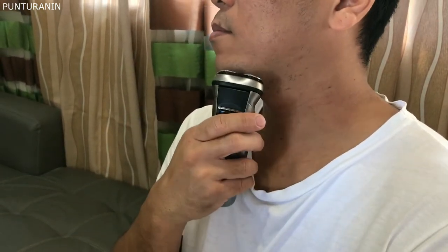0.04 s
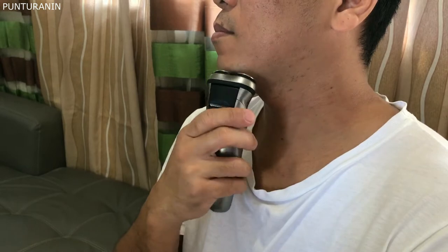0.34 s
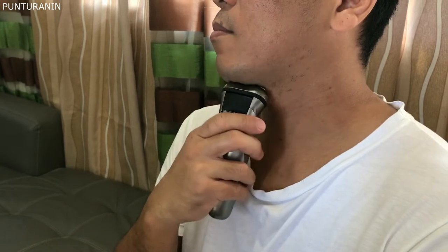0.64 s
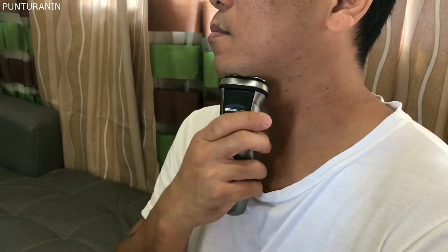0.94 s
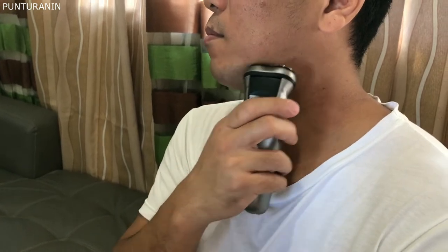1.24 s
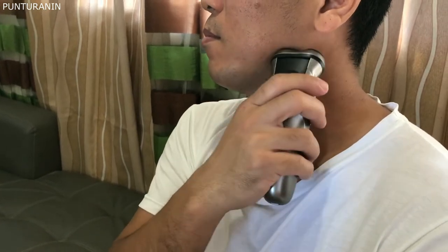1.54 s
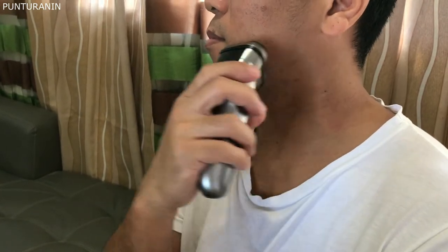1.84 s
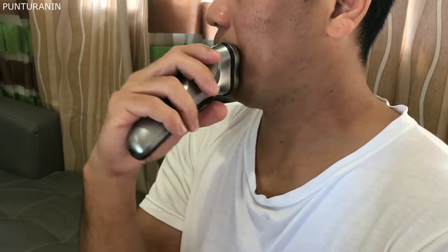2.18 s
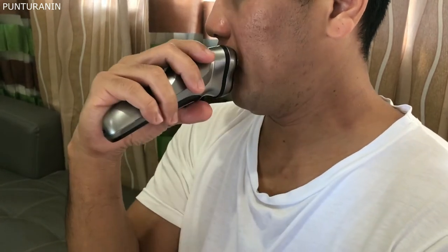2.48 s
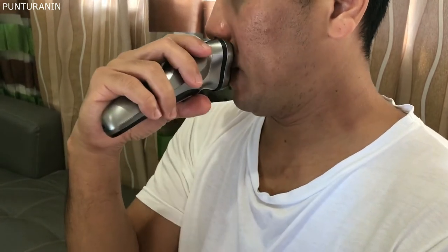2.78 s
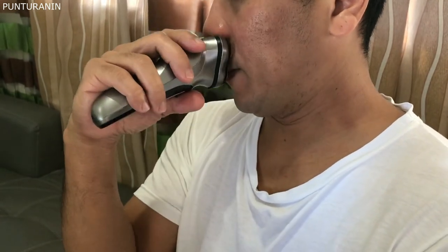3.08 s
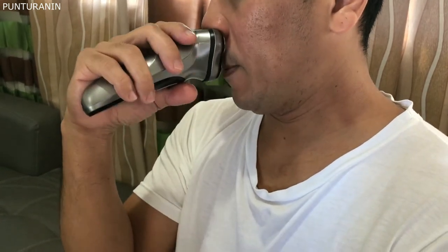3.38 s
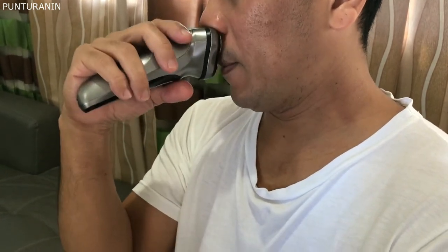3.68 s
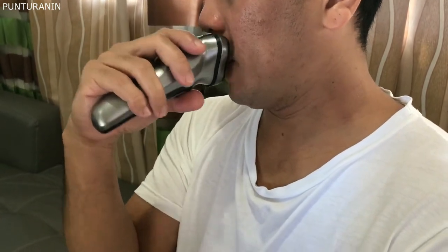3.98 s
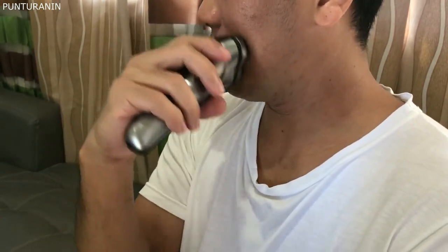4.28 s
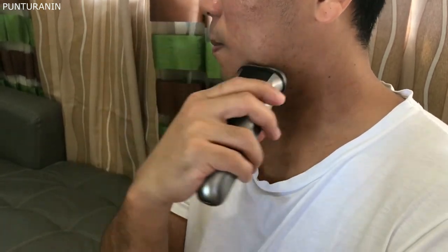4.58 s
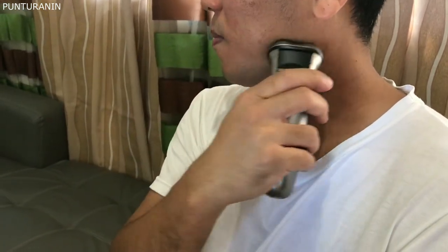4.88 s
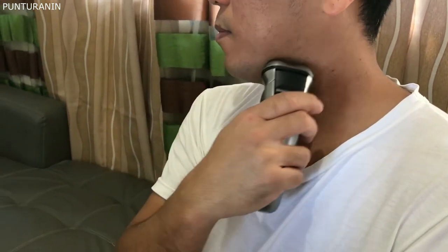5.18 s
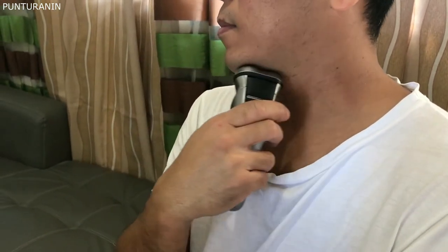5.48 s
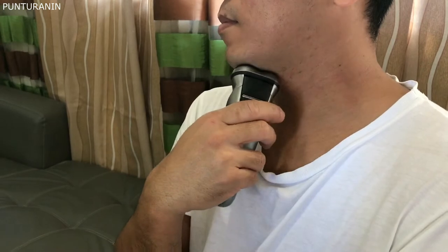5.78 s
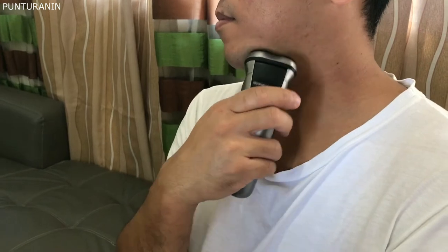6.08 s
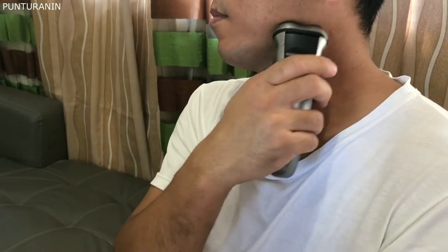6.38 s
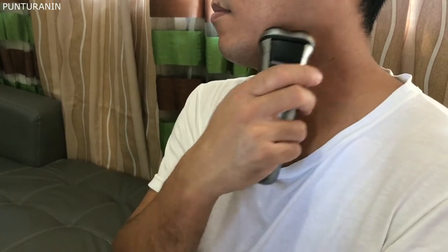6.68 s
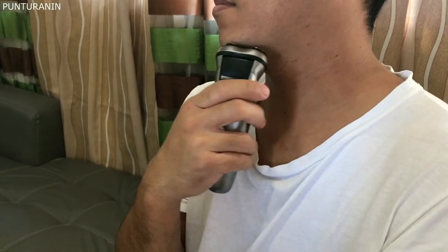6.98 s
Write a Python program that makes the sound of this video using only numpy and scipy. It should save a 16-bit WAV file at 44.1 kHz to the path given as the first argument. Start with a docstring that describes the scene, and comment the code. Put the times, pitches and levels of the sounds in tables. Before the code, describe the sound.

A rotary electric shaver runs without a break, close to the microphone in a quiet room. Its small motor holds a steady high whine under a bright, metallic scraping buzz. Stubble crackles and sizzles finely as it is cut, and the tone shifts slightly as the head slides over neck and chin. Now and then the hiss briefly thins to glassy tones. Soft low bumps and a faint sleeve rustle come from the moving arm.

```python
"""Rotary electric shaver on neck and chin

Close by, in a quiet room, a small motor whines and drives the cutters through gears. The blades scrape
round inside metal guards, whose resonances open and shut as skin covers them. Stubble crackles as it
snaps; hand and arm add soft rumbles and a rustle. Now and then the hiss thins briefly to glassy tones."""
import sys
import numpy as np
from scipy import signal
from scipy.fft import rfft, irfft, next_fast_len
from scipy.io import wavfile
from scipy.ndimage import uniform_filter1d

SR = 44100
rng = np.random.default_rng(int(sys.argv[2]) if len(sys.argv) > 2 else 0)


def digitize_waveform(pressure):
    """Quantize a signal to 16-bit integers and store it at the path in sys.argv[1].

    Rows of a 2-D input are taken as channels; values are limited to [-1, 1].
    """
    field = np.atleast_2d(pressure).T
    bounded = np.clip(field, -1, 1)
    quanta = np.round(bounded * 32767).astype(np.int16)
    wavfile.write(sys.argv[1], SR, quanta)


N = 310023
T = np.arange(N) / SR

# head resonances: (centre [Hz], half width [Hz], lift [dB], rattles [1/cutter turn], rattle swing [dB])
HEAD_MODES = [(2402, 87, 7.5, 1, 2), (2801, 31, 7, 3, 5.5), (3106, 116, 4.5, 3, 4), (3485, 180, 4, 3, -4.5),
              (4210, 145, 3.5, 3, 2.5), (5790, 230, 7, 3, 4.5), (7210, 150, 9.5, 3, 4)]
# brief level dips: (middle [s], length [s], depth [dB])
DIPS = [(.063, .045, -32), (.283, .022, -16), (.399, .027, -14), (.491, .03, -9), (.7, .022, -15),
        (.957, .025, -15), (1.072, .02, -14), (1.329, .023, -16), (1.444, .022, -15), (1.492, .02, -12),
        (1.621, .046, -27), (1.817, .068, -40), (1.956, .031, -7), (2.372, .028, -13), (2.443, .022, -9),
        (2.992, .05, -25), (3.046, .02, -14), (3.116, .02, -12), (3.255, .028, -15), (3.603, .022, -15),
        (3.778, .048, -29), (3.881, .023, -12), (4.082, .048, -28), (4.509, .016, -12), (4.788, .021, -14),
        (5.147, .052, -27), (6.089, .026, -13), (6.297, .022, -16), (6.505, .023, -16)]
FAINT_DB = -66  # partials listed below this level follow the dips


def amp(db):
    """Decibels to amplitude."""
    return 10 ** (np.asarray(db) / 20)


def unit_rms(x):
    """Scales x to rms 1."""
    return x / np.sqrt(np.mean(x ** 2) + 1e-20)


def curve(rows):
    """(time, value) rows joined by straight lines, per sample."""
    return np.interp(T, *np.transpose(rows))


def spectrum_db(points, hz):
    """(frequency, dB) points interpolated over log frequency."""
    point_hz, db = np.transpose(points)
    return np.interp(np.log(hz + 1), np.log(point_hz), db)


def colour(x, points):
    """Filters x with a spectrum; rms 1."""
    size = next_fast_len(N)
    gain = amp(spectrum_db(points, np.fft.rfftfreq(size, 1 / SR)))
    return unit_rms(irfft(rfft(x, size) * gain, size)[:N])


def drift(rate_hz, knots=2048):
    """Smooth random wander up to about rate_hz; rms 1."""
    hz = np.fft.rfftfreq(knots, T[-1] / knots)
    slow = irfft(rfft(rng.standard_normal(knots)) * bell(hz, 0, rate_hz))
    return np.interp(T, np.linspace(0, T[-1], knots), unit_rms(slow))


def swell(middle_s, length_s):
    """Half-cosine rise and fall, 0-1."""
    return np.cos(np.pi * np.clip((T - middle_s) / length_s, -.5, .5))


def bell(hz, centre_hz, width_hz):
    """Gaussian band, 0-1."""
    return np.exp(-.5 * ((hz - centre_hz) / width_hz) ** 2)


def dips_db():
    """All dips as one gain curve."""
    return sum(db * swell(middle_s, length_s) for middle_s, length_s, db in DIPS)


def patchy(x, patch_s=.13, patch_hz=600, size=512):
    """The colour of a hiss shifts in broad patches from stroke to stroke."""
    # (frequency [Hz], rms swing [dB])
    patch_depth = [(250, 2.2), (800, 2.2), (1400, 1), (4500, 0.8), (7000, 1.4), (9000, 1.8), (15000, 2)]
    hz, _, bands = signal.stft(x, SR, nperseg=size)
    field = uniform_filter1d(rng.standard_normal(bands.shape), round(patch_s * SR / size * 2), axis=1)
    field = unit_rms(uniform_filter1d(field, round(patch_hz / hz[1]), axis=0))
    gain = amp(spectrum_db(patch_depth, hz)[:, None] * field)
    gain /= np.sqrt(np.mean(gain ** 2, axis=1, keepdims=True))
    return signal.istft(bands * gain, SR, nperseg=size)[1][:N]


def room(hum_hz=363, hum_db=-82, air_db=-59):
    """Quiet air and a faint wavering hum that swells once."""
    # air spectrum: (frequency [Hz], level [dB])
    air_colour = [(20, -6), (60, 18.5), (100, -11), (200, -5), (1000, -5), (15000, 2.5)]
    # (middle [s], length [s], level [dB])
    hum_swell = (4.62, 0.38, -60)
    middle_s, length_s, swell_db = hum_swell
    hum = unit_rms(np.cos(2 * np.pi * hum_hz * T + 1.07 * drift(7)))
    hum *= amp(hum_db) + amp(swell_db) * swell(middle_s, length_s)
    return hum + amp(air_db) * colour(rng.standard_normal(N), air_colour)


def rumble(deep_db=-62.5, upper_db=-71.5):
    """The grip rumbles softly, each push of the arm adds a low bump, and the sleeve rustles."""
    # hand and arm bumps: (middle [s], length [s], deep level [dB], upper level [dB])
    bumps = [(0.47, 0.25, -91, -54.5), (0.685, .18, -64, -59), (1.008, 0.2, -58, -46),
             (1.18, 0.33, -60, -45.5), (1.692, 0.068, -56, -49.5), (2.49, 0.21, -56, -56),
             (2.664, 0.097, -55, -49.5), (2.776, 0.17, -51, -51), (3.575, 0.21, -54, -56),
             (3.964, 0.25, -69, -58), (4.2, 0.15, -53.5, -51), (4.536, 0.27, -49.5, -47),
             (4.687, 0.23, -56, -48)]
    # loudest as the arm swings from chin to neck: (time [s], level [dB])
    rustle_level = [(0.0, -67), (0.8, -62.5), (1.03, -55), (1.4, -63), (2.4, -65.5), (3.8, -59),
                    (4.42, -57), (4.65, -52.5), (4.85, -63), (5.1, -68.5), (5.38, -63), (6.3, -64.5),
                    (7.03, -64)]
    # spectra: (frequency [Hz], level [dB])
    deep_colour = [(20, -34), (45, -8), (70, 12), (88, 17.5), (100, 14.5), (115, -12), (160, -42),
                   (400, -58)]
    upper_colour = [(80, -21), (120, 16.5), (145, 12.5), (170, 8), (195, 2.5), (260, 3), (310, -9.5),
                    (1000, -21)]
    rustle_colour = [(150, -0.5), (260, -1.5), (325, -3), (450, -4), (610, 0), (750, -4.5), (1050, -1),
                     (1500, -2), (4000, -56)]
    deep_bumps = sum(amp(db) * swell(middle_s, length_s) for middle_s, length_s, db, _ in bumps)
    upper_bumps = sum(amp(db - 6.5) * swell(middle_s, length_s) for middle_s, length_s, _, db in bumps)
    uneven_db = 1.5 * drift(12)
    deep = np.hypot(amp(deep_db + drift(15)), deep_bumps) * colour(rng.standard_normal(N), deep_colour)
    upper = np.hypot(amp(upper_db), upper_bumps) * colour(rng.standard_normal(N), upper_colour)
    rustle = amp(curve(rustle_level)) * patchy(colour(rng.standard_normal(N), rustle_colour))
    return deep + amp(uneven_db + dips_db()) * (upper + rustle)


def partial(turns, order, db, waver_db=0, waver_hz=3, wobble_rad=0):
    """One tone locked to a shaft, with optional waver in level and phase."""
    phase = 2 * np.pi * (order * turns + rng.random()) + wobble_rad * drift(waver_hz)
    return amp(db) * unit_rms(np.cos(phase) * amp(waver_db * drift(waver_hz)))


def motor(turns):
    """Motor and pinion whine; four strong partials swell and fade with grip and angle."""
    # weaker partials: (order [1/motor turn], level [dB])
    orders = [(6, -73.5), (8, -74.5), (10, -72), (12, -69.5), (20, -80), (27, -62)]
    # strong partials, by order: (time [s], level [dB])
    whine_9 = [(0.0, -60), (0.4, -72.5), (0.65, -62), (1.26, -68), (1.86, -53), (2.31, -64.5), (3.06, -74),
               (4.77, -62), (5.07, -78), (5.22, -62.5), (5.77, -57.5), (6.53, -75), (7.03, -65)]
    whine_11 = [(0.0, -61), (0.32, -76), (0.7, -58), (1.98, -80), (2.83, -54), (3.89, -64), (4.09, -59),
                (4.47, -63), (4.52, -73), (4.62, -68.5), (5.3, -58), (7.02, -67)]
    whine_13 = [(0.0, -52.5), (0.35, -57), (0.45, -49.5), (2.96, -49.5), (3.62, -53), (4.27, -48.5),
                (5.98, -54.5), (6.28, -49), (6.53, -52.5), (7.03, -50.5)]
    whine_14 = [(0.0, -55.5), (0.75, -53), (1.36, -62), (1.61, -56), (1.76, -62), (2.41, -57),
                (4.32, -54.5), (4.47, -68), (5.88, -52.5), (6.63, -69), (6.78, -51), (7.03, -73)]
    dip_gain, whine = amp(dips_db()), 0
    for order, db in orders:
        tone = partial(turns, order, db, waver_db=3.5, waver_hz=3.5, wobble_rad=.36)
        whine += tone * (dip_gain if db < FAINT_DB else 1)
    for order, level in (9, whine_9), (11, whine_11), (13, whine_13), (14, whine_14):
        whine += partial(turns, order, curve(level) - 3)
    return whine


def gears(motor_turns, ratio=20 / 51, off_centre_turns=.00135, play_turns=.0003):
    """Cutter turns; an off-centre pinion and tooth play make them uneven, which gives side tones."""
    runout = off_centre_turns * np.sin(2 * np.pi * motor_turns)
    return ratio * motor_turns + runout + play_turns * drift(30)


def head_openings_db():
    """How freely each head resonance rings as skin covers and uncovers it."""
    # in HEAD_MODES order: (time [s], change of lift [dB])
    ring_1 = [(0.0, 6), (0.42, 2), (0.55, -2), (1.0, -3), (1.09, 3), (1.3, 6.5), (1.5, -9), (1.67, -7),
              (1.8, 6.5), (2.05, 4), (2.24, 1), (2.48, 4), (2.58, 9), (2.8, 6.5), (2.88, 3), (3.03, 4),
              (3.15, -1), (3.38, 5.5), (3.59, -5), (3.68, 5), (3.88, 4.5), (4.0, 7.5), (4.12, 2.5),
              (4.3, 1.5), (4.49, -6), (4.61, -4), (4.92, -20), (5.06, 0.5), (5.24, -17), (5.51, -2.5),
              (5.97, -1.5), (6.06, 4), (6.25, -12), (7.02, 6.5)]
    ring_2 = [(0.0, 0.5), (0.5, 6.5), (0.68, 5.5), (0.94, 2), (1.27, 0), (1.39, 7.5), (1.73, 6), (1.9, -1),
              (2.24, 1), (2.45, 5.5), (2.65, 0), (3.69, 1.5), (4.34, -6), (4.5, 4.5), (4.67, -6), (4.9, -3),
              (5.09, 5), (5.33, -14), (5.47, 5), (5.6, 1.5), (5.82, 5), (6.1, 1.5), (6.26, 5), (6.49, -1),
              (6.6, 9), (7.02, 5.5)]
    ring_3 = [(0.0, -1), (0.42, -2), (0.56, -14), (0.68, 3.5), (1.04, -9), (1.32, 0), (1.7, 3), (1.99, 1),
              (2.81, 3.5), (3.51, -1), (4.28, 1), (4.57, 1), (5.159, -2.5), (5.81, -2), (6.03, -7.5),
              (6.6, 0), (7.02, -8)]
    ring_4 = [(0.0, -1), (0.3, 6.5), (0.8, -4.5), (1.25, 3), (1.34, 1), (1.77, 0), (1.96, -4.5),
              (2.93, -8.5), (4.17, -2), (4.45, 5), (4.59, 4), (4.66, -3), (5.3, -8), (5.47, 2), (5.54, -2),
              (6.07, 4), (6.37, -7), (6.66, 0), (6.74, 6), (7.02, 10.5)]
    ring_5 = [(0.0, 2), (0.3, 2.5), (0.67, 0), (1.05, -1.5), (1.6, 0.5), (1.82, 5), (1.92, 0), (2.2, -2),
              (2.3, 3.5), (2.55, 4.5), (2.85, -0.5), (3.51, -2), (3.63, 2.5), (3.8, -6), (4.02, -1),
              (4.32, -1), (4.7, 2), (4.95, 5.5), (5.12, -1), (5.38, 6), (5.47, 3), (5.8, -2), (6.3, 4),
              (6.59, 3), (7.02, -1.5)]
    ring_6 = [(0.0, 3), (0.31, 5), (0.45, -1), (0.75, -2.5), (1.02, 1), (1.42, -0.5), (1.55, 0.5),
              (1.78, -3.5), (2.0, 0.5), (2.88, -2), (3.58, 2.5), (4.33, 2.5), (4.47, -4.5), (4.68, 4),
              (4.8, 2.5), (5.03, -4), (5.25, 1), (5.45, -3), (5.75, -2), (6.1, 1), (6.32, -1), (6.42, -6),
              (7.02, 3.5)]
    ring_7 = [(0.0, -1), (0.27, -2), (0.57, -7), (0.69, -1), (0.98, -21), (1.28, -5), (1.58, -1),
              (1.86, -1), (1.95, -9), (2.56, 5.5), (3.03, 2.5), (4.21, 8), (4.45, 4), (4.94, -3), (5.05, 2),
              (5.77, -5.5), (6.49, -0.5), (7.02, -3.5)]
    return [curve(ring) for ring in (ring_1, ring_2, ring_3, ring_4, ring_5, ring_6, ring_7)]


def cutters(turns, follow_db_per_db=1.46, chin_damping_db=-2):
    """Blades buzz past the guard slots; each partial swells with the resonance it lies in."""
    # buzz, and partials that sing only against the chin: (order [1/cutter turn], level [dB])
    buzz_orders = [(2, -74), (30, -76), (31, -82), (42, -66), (43, -79), (44, -75), (45, -61), (49, -68.5),
                   (50, -57.5), (52, -77), (53, -92), (58, -55), (61, -55.5), (64, -59.5), (69, -64),
                   (87, -53), (90, -56), (93, -68), (108, -58), (116, -52), (119, -54), (121, -58),
                   (124, -59)]
    chin_orders = [(84, -50.5), (90, -50.5)]
    # head flat on the chin: (time [s], contact [0-1])
    chin_contact = [(1.85, 0.1), (2.3, 0.6), (2.9, 0.8), (3.4, 0.35), (4.2, 0.4), (4.45, 0)]
    turn_hz = turns[-1] / T[-1]
    openings_db, dip_gain, buzz = head_openings_db(), amp(dips_db()), 0
    for order, db in buzz_orders:
        lift_db = follow_db_per_db * sum(
            bell(order * turn_hz, centre_hz, width_hz) * open_db
            for (centre_hz, width_hz, *_), open_db in zip(HEAD_MODES, openings_db))
        tone = partial(turns, order, db + lift_db, waver_db=2, waver_hz=11, wobble_rad=.29)
        buzz += tone * (dip_gain if db < FAINT_DB else 1)
    singing = sum(partial(turns, order, db, waver_db=4, waver_hz=4.4, wobble_rad=.18)
                  for order, db in chin_orders)
    on_chin = curve(chin_contact)
    return amp(chin_damping_db * on_chin) * buzz + on_chin * singing


def impulses(per_s, spread_db, max_spreads):
    """Random impulses with a capped exponential spread of levels."""
    hits = rng.random(N) < per_s / SR
    return hits * amp(spread_db * np.minimum(rng.exponential(1, N), max_spreads))


def decaying(hits, decay_s, samples):
    """Envelope that jumps at each hit and dies away."""
    return signal.oaconvolve(hits, np.exp(-T[:samples] / decay_s))[:N]


def hair_snaps(thick_per_s=12, clump_db=.8):
    """Tiny clicks in clumps; now and then a thick hair gives a short, louder rasp."""
    clicks = impulses(per_s=4000, spread_db=2.2, max_spreads=4)
    snaps = decaying(clicks, decay_s=.0006, samples=N // 128) * rng.standard_normal(N)
    thick_hits = (rng.random(N) < thick_per_s / SR) * rng.random(N)
    thick = decaying(thick_hits, decay_s=.008, samples=N // 128)
    return unit_rms(snaps * amp(clump_db * drift(20)) * (1 + .9 * thick))


def crackle():
    """Stiff hairs break in short noise bursts."""
    breaks = impulses(per_s=25, spread_db=3.5, max_spreads=2.5)
    return unit_rms(decaying(breaks, decay_s=.009, samples=N // 64) * rng.standard_normal(N))


def stubble():
    """Hairs snap between blade and slot: a fine rasp with a crackling sizzle on top."""
    # amount of hair cut, and its treble sizzle: (time [s], level [dB])
    cutting_level = [(0.0, -2.5), (1.41, -3), (1.5, -5.5), (2.17, 0), (2.43, -7), (2.8, 1), (3.04, -1.5),
                     (3.44, -2), (3.55, -5), (3.72, 0), (3.88, -3), (4.02, -2), (4.52, -2.5), (4.6, 1.5),
                     (4.79, -2), (4.94, -0.5), (5.05, -3.5), (5.37, -0.5), (5.95, -3.5), (6.06, -6),
                     (6.16, -10), (6.24, -7.5), (6.85, -5.5), (7.02, 2)]
    sizzle_level = [(0.0, -60), (0.73, -63), (0.91, -53), (1.35, -60), (1.43, -51), (1.52, -64),
                    (1.78, -57), (1.94, -67), (2.16, -53), (2.27, -61), (2.81, -53.5), (3.2, -66),
                    (3.43, -50), (3.54, -66), (3.71, -54), (3.92, -69), (4.05, -60), (4.25, -65),
                    (4.37, -58), (4.47, -65), (4.8, -61), (4.93, -55), (5.03, -57), (5.18, -52), (5.4, -59),
                    (5.94, -66), (6.07, -53), (6.17, -66), (6.48, -58), (7.02, -58)]
    # spectra: (frequency [Hz], level [dB])
    snap_colour = [(500, -3), (1900, 8), (2500, 15), (4500, 16), (4950, 15), (5400, 13.5), (7700, 11.5),
                   (9000, 11.5), (10300, -3.5), (12000, -8), (15700, -35)]
    sizzle_colour = [(6000, -30), (9500, -10), (10500, -3), (11400, 3), (12200, 3), (12950, 2.5),
                     (13600, 4), (14300, -13), (15700, -7)]
    snaps = hair_snaps()
    rasp = amp(curve(cutting_level) - 44) * colour(snaps, snap_colour)
    sizzle = amp(curve(sizzle_level) - 5) * colour(snaps + .6 * crackle(), sizzle_colour)
    return rasp + sizzle


def worn_track(turns, count=8, points_per_turn=900):
    """Roughness met again on every turn; the contact slowly shifts from one track to the next."""
    tracks = signal.resample(rng.standard_normal((count, points_per_turn)), points_per_turn * 8, axis=1)
    place = (turns % 1 * tracks.shape[1]).astype(int)
    shift = T / T[-1] * (count - 1)
    return sum(np.cos(np.pi / 2 * np.clip(shift - k, -1, 1)) * track[place]
               for k, track in enumerate(tracks))


def throb_db(turns, order, depth_db):
    """Contact swings `order` times a turn, with wandering timing."""
    return depth_db * np.cos(2 * np.pi * order * turns + .078 * drift(.91))


def rattle(turns, order, depth_db):
    """Sawtooth gain, rms 1: blades strike the head `order` times a turn."""
    phase = 2 * np.pi * order * turns + .27 * drift(.96)
    return unit_rms(amp(depth_db * signal.sawtooth(phase, width=.15)))


def scrape(motor_turns, cutter_turns, repeat_share=.54, follow_db_per_db=.86):
    """Blades rub their guards, harder at some angles of each turn, and rattle the head's resonances."""
    # blade pressure: (time [s], level [dB])
    pressure = [(0.0, -1.5), (0.62, 0), (1.4, 0.5), (1.71, -1), (2.14, 1), (2.42, 0.5), (2.79, 1),
                (3.23, 0), (4.7, -2.5), (4.92, 0), (5.81, -1), (6.49, 1), (6.61, 0.5), (7.02, -1.5)]
    # housing response: (frequency [Hz], gain [dB])
    housing = [(100, -13), (450, -22.5), (650, -9.5), (900, -32), (1200, -11), (1450, 1.5), (1900, -6),
               (2200, 0), (2700, 0), (3750, -0.5), (4600, 2.5), (4950, -4), (5200, 3), (6600, 1),
               (7700, -10), (8500, -1), (10300, -17), (15700, -53)]
    rub = np.sqrt(repeat_share) * worn_track(cutter_turns)
    rub += np.sqrt(1 - repeat_share) * rng.standard_normal(N)
    contact_db = (throb_db(cutter_turns, order=3, depth_db=-.95)
                  + throb_db(motor_turns, order=1, depth_db=.15)
                  + throb_db(cutter_turns + rng.random(), order=6, depth_db=.06)
                  + .6 * drift(16))
    framing = dict(fs=SR, nperseg=512, noverlap=384)
    hz, _, bands = signal.stft(rub * amp(contact_db), **framing)
    bands *= amp(spectrum_db(housing, hz)[:, None])
    sound = signal.istft(bands, **framing)[1][:N]
    for (centre_hz, width_hz, lift_db, order, swing_db), open_db in zip(HEAD_MODES, head_openings_db()):
        mode = signal.istft(bands * bell(hz[:, None], centre_hz, width_hz), **framing)[1][:N]
        gain = amp(lift_db + follow_db_per_db * open_db) * rattle(cutter_turns, order, swing_db)
        sound += mode * (gain - 1)
    return amp(curve(pressure) - 40.5) * unit_rms(sound)


def thin_to_tones(hiss, gap_hz=290, fade_range_db=(11, 19), scatter_db=4.5, size=4096):
    """In each dip the hiss gives way to steady tones at its own peaks, so the loudness holds."""
    hz, tones = np.fft.rfftfreq(size, 1 / SR), np.zeros(N)
    for middle_s, length_s, depth_db in DIPS:
        middle = round(middle_s * SR)
        span = slice(middle - size // 2, middle + size // 2)
        spectrum = rfft(hiss[span] * np.hanning(size))
        peaks = signal.find_peaks(abs(spectrum), distance=gap_hz / hz[1])[0]
        heights = abs(spectrum[peaks]) * amp(scatter_db * rng.standard_normal(len(hz))[peaks])
        below_top_db = 20 * np.log10(np.percentile(heights, 95) / heights)
        heights *= amp(depth_db * np.interp(below_top_db, fade_range_db, [0, 1]))  # weak peaks fade
        chord = heights @ np.cos(2 * np.pi * hz[peaks, None] * T[span] + np.angle(spectrum[peaks, None]))
        fill = np.sqrt(1 - amp(depth_db * swell(middle_s, length_s)[span] ** 2) ** 2)
        tones[span] += hiss[span].std() * unit_rms(chord) * fill
    return amp(dips_db()) * hiss + tones


def scene():
    """One motor drives whine, buzz and scrape; stubble, rumble and room join them. Mono."""
    # the motor sags under load: (time [s], speed [turns/s])
    motor_speed = [(0.0, 123.92), (0.32, 124.42), (0.57, 123.54), (2.12, 123.78), (2.52, 122.62),
                   (2.58, 123.64), (3.34, 123.45), (3.38, 123.09), (3.65, 123.98), (3.72, 123.39),
                   (3.88, 123.81), (4.48, 123.55), (4.81, 123.99), (4.99, 123.54), (5.44, 123.78),
                   (6.32, 123.95), (6.5, 123.31), (7.03, 123.96)]
    motor_turns = np.cumsum(curve(motor_speed)) / SR
    cutter_turns = gears(motor_turns)
    hiss = thin_to_tones(patchy(scrape(motor_turns, cutter_turns) + stubble()))
    shaver = motor(motor_turns) + cutters(cutter_turns) + hiss
    return (shaver + rumble() + amp(dips_db()) * room())[None]


def record(dry):
    """Steep low-pass band limit."""
    edge_hz = 15720
    lowpass = signal.firwin(1023, edge_hz, window=("kaiser", 9), fs=SR)
    return signal.oaconvolve(dry, lowpass[None], "same")


dry = scene()
out = record(dry)
digitize_waveform(out)
```